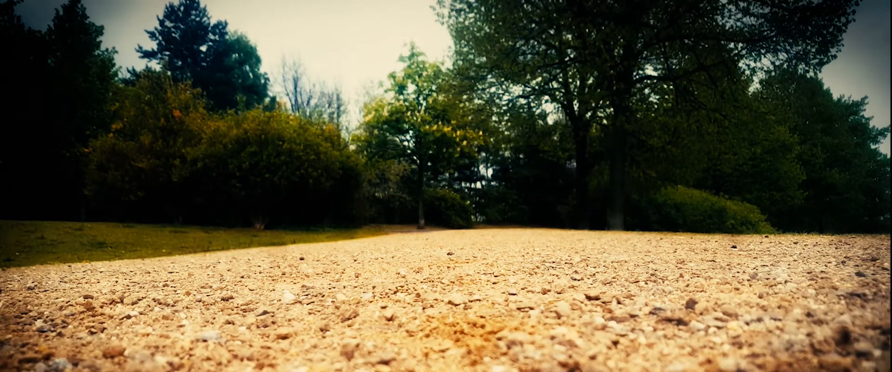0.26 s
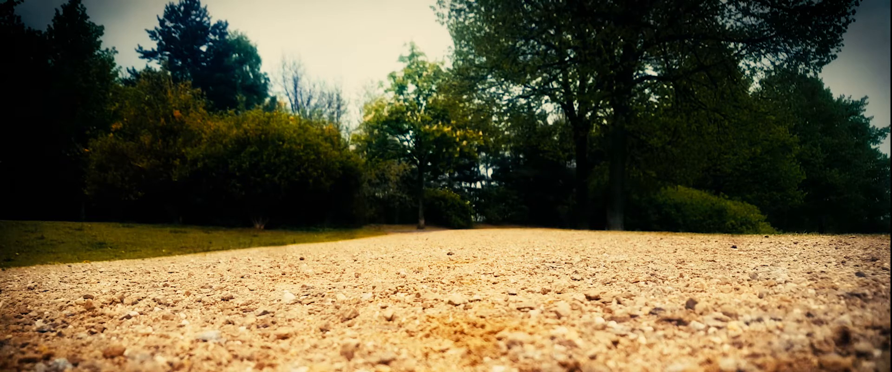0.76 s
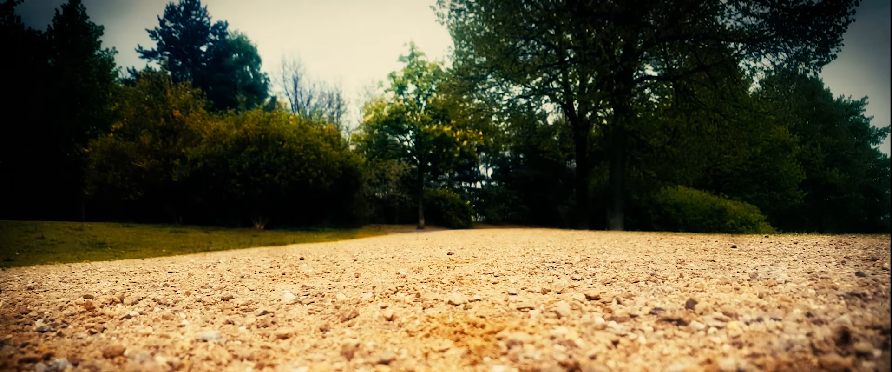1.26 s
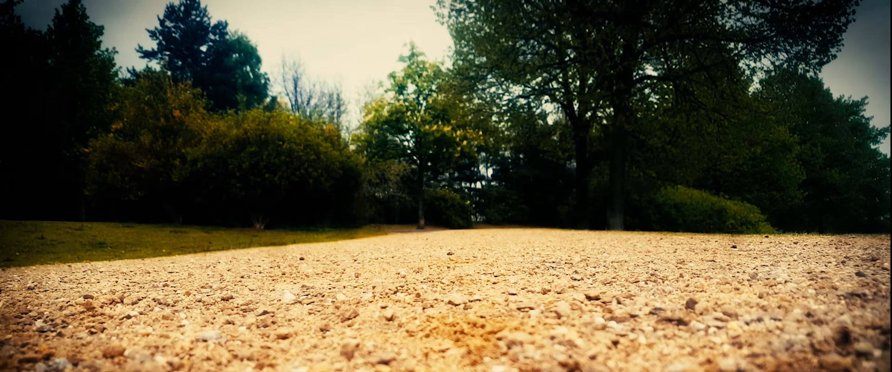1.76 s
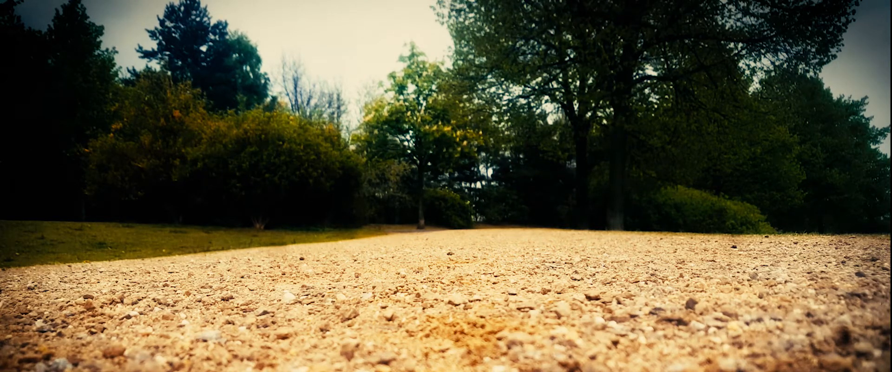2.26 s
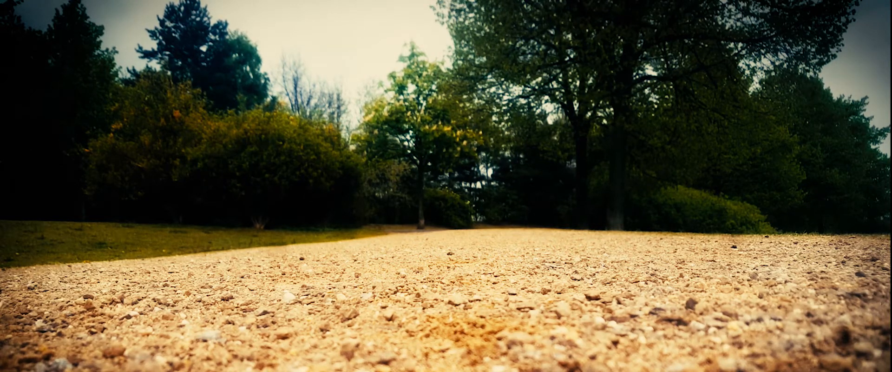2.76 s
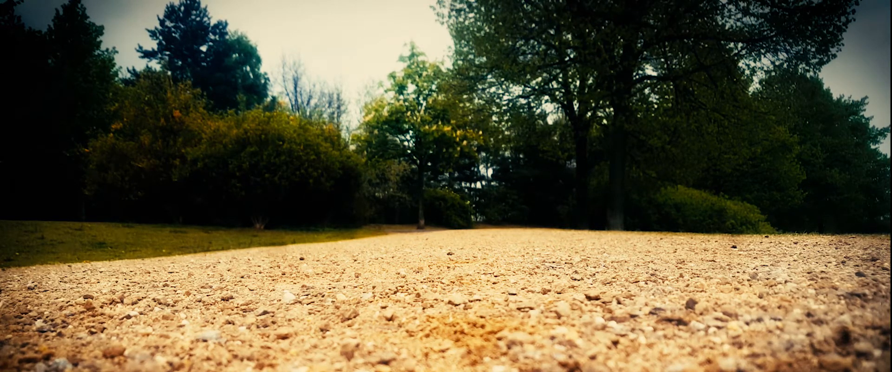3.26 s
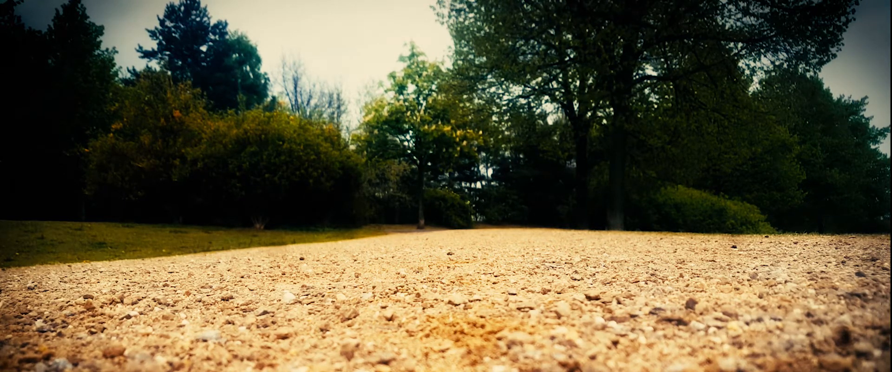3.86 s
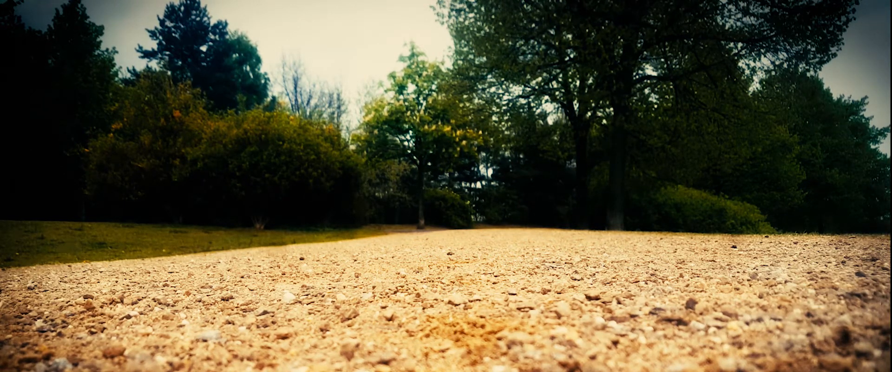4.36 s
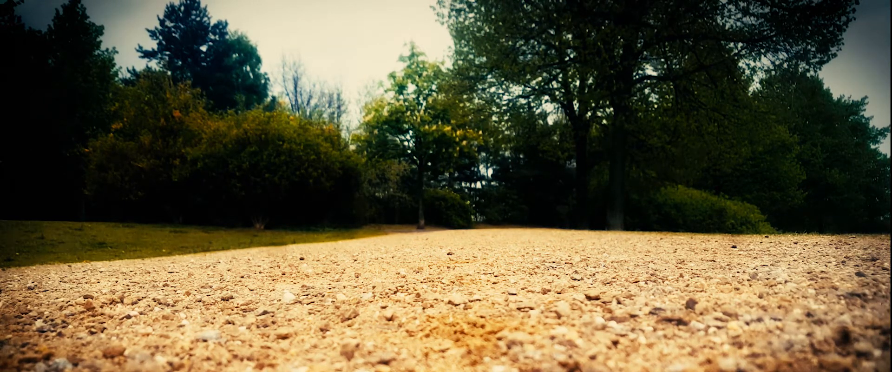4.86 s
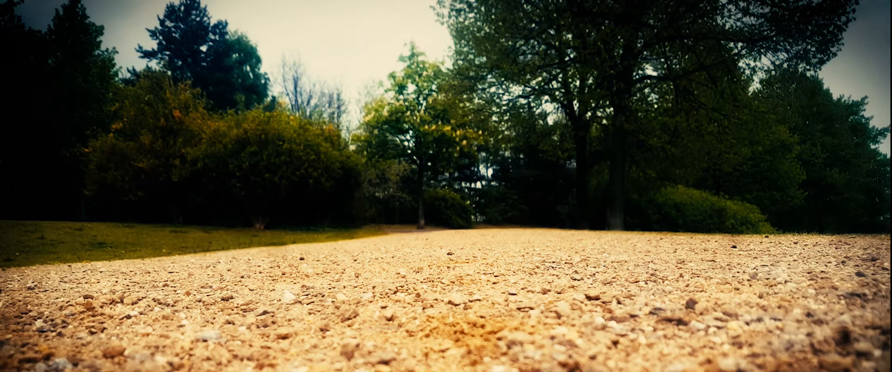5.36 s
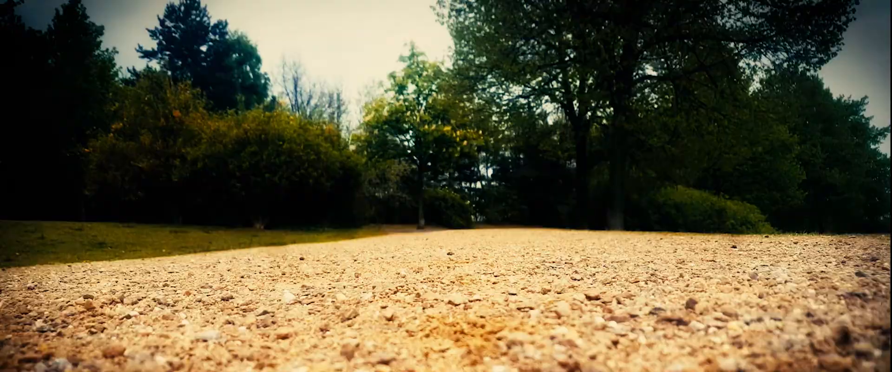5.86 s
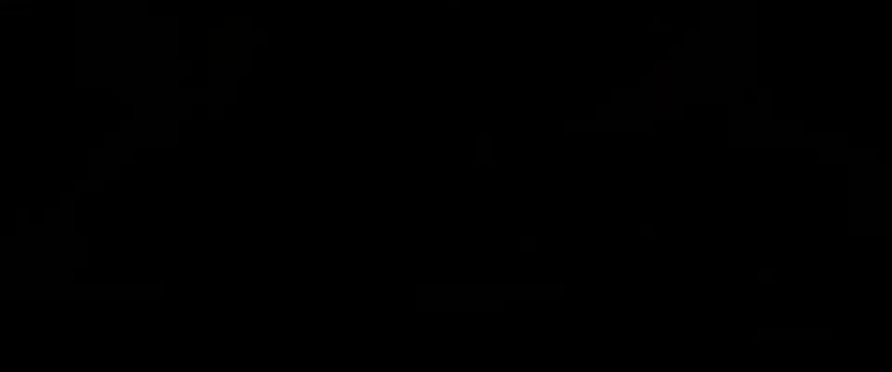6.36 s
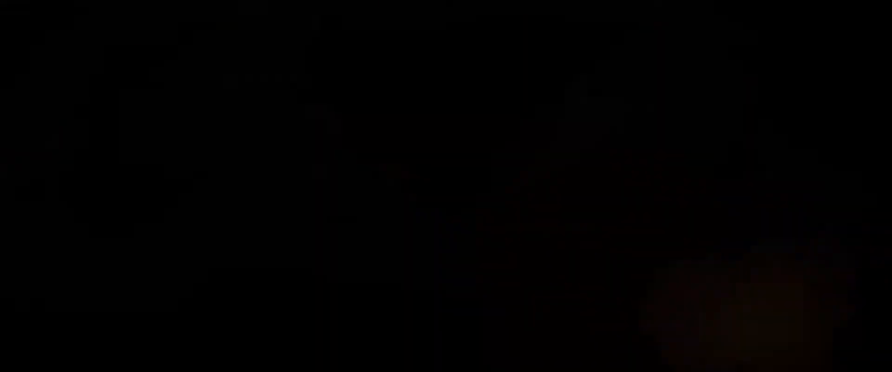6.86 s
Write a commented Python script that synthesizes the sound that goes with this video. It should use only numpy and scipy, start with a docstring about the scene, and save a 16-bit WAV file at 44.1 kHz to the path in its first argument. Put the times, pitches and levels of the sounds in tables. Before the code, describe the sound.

A distant remote-controlled car revs in short, growing bursts, its high electric whine mixed with rough gears and tyres spinning on gravel. A few thin bird chirps and a faraway drone sit behind it. One longer burst brings the car racing past, left to right, very close to microphones on the ground. Its wake buffets them loudly, then pebbles clatter, clink and knock in a thinning shower.

```python
"""A radio-controlled electric car blips its throttle far down a gravel path, then races past.
Its motor whines, its gears growl and its spinning tyres spray gravel. As it passes two microphones
on the ground, from left to right, its wake buffets them and thrown stones knock on their case.
A small bird chirps in the trees over a distant rumble and the hum of faraway machinery."""
import sys
import numpy as np
from scipy import signal
from scipy.fft import rfft, irfft, next_fast_len
from scipy.io import wavfile
from scipy.ndimage import uniform_filter1d, map_coordinates

SR = 44100
rng = np.random.default_rng(int(sys.argv[2]) if len(sys.argv) > 2 else 0)


def store_wav(level_fs):
    """Save 16-bit WAV to argv[1]."""
    pcm = np.round(np.clip(np.atleast_2d(level_fs), -1, 1) * 32767)
    wavfile.write(sys.argv[1], SR, pcm.T.astype(np.int16))


N = 313928
T = np.arange(N) / SR


def from_db(db):
    """Turn decibels into a gain to multiply by."""
    return 10 ** (np.asarray(db) / 20)


def rms_one(x):
    """Scale a signal to an average power of 1."""
    return x / np.sqrt(np.mean(x ** 2) + 1e-20)


def in_time(rows):
    """Join rows that begin with a time by straight lines: one curve for each other column."""
    times, *columns = np.transpose(rows)
    return [np.interp(T, times, column) for column in columns]


def at_hz(points, hz):
    """Look up a frequency in a table, with octaves evenly spaced."""
    freqs, values = np.transpose(points)
    return np.interp(np.log(hz + 1), np.log(freqs), values)


def drift(rate_hz):
    """A smooth random wobble, about 1 in size."""
    r = np.exp(-20 * np.pi * rate_hz / SR)
    slow = signal.lfilter([1], [1, -2 * r, r * r], rng.standard_normal(N // 10 + 4002))[4000:]
    return np.interp(np.arange(N) / 10, np.arange(len(slow)), rms_one(slow))


def gate(start, end, rise, fall):
    """Fade in from start and die away after end; all in seconds."""
    return np.clip((T - start) / rise, 0, 1) * np.exp(-np.clip((T - end) / fall, 0, 20))


def turn(hz):
    """The phase of a tone whose pitch may move."""
    return 2 * np.pi * np.cumsum(hz * np.ones(N)) / SR


def narrow_noise(hz, width_hz):
    """A rough tone: noise gathered around one pitch."""
    return drift(width_hz) * np.cos(turn(hz)) + drift(width_hz) * np.sin(turn(hz))


def noise(spectrum, likeness, grains=1):
    """Stereo noise, chopped into grains and then coloured. Likeness 1: both sides same; -1: opposite."""
    size = next_fast_len(N)
    hz = np.arange(size // 2 + 1) * SR / size
    mid, side = rfft(rng.standard_normal((2, N)) * grains, size)
    alike = np.clip(at_hz(likeness, hz), -1, 1)
    edge_fade = np.minimum(hz / spectrum[0][0], 1) ** 2 / np.maximum(hz / spectrum[-1][0], 1) ** 4
    pair = np.sqrt(1 + alike) * mid + np.sqrt(1 - alike) * side * [[1], [-1]]
    return rms_one(irfft(pair * from_db(at_hz(spectrum, hz)) * edge_fade, size)[:, :N])


def pebbles(per_s, spread_db, ring_s, clump_db):
    """The jumpy loudness of pebbles colliding in clumps: many small ones, a few large."""
    hits = rng.random(N) < per_s / SR
    size_db = spread_db * np.minimum(rng.exponential(1, N), 5) + clump_db * drift(39)
    energy = hits * from_db(size_db) ** 2
    return rms_one(np.sqrt(signal.lfilter([1], [1, -np.exp(-1 / (ring_s * SR))], energy + 1e-12)))


# Blips of the throttle. Each row: start and end in seconds, final growl pitch in Hz, relative levels
# in dB (gears, whine, step per overtone, controller tone, crunch, spray, grit), spray rise in seconds.
THROTTLE_BURSTS = [(0, .44, 1397, -57, -71.5, -2, -78, -70, -64.5, -80, 0.17),
                   (.58, .77, 1423, -57.5, -67.5, -4, -67, -71, -68.5, -84, 0.05),
                   (0.799, 1.275, 1330, -51.5, -68, 0, -70, -63.5, -57, -62.5, 0.36),
                   (1.448, 1.63, 1360, -52, -64.5, -8, -71, -69, -65, -73, .03),
                   (1.772, 1.97, 1326, -50.5, -60.5, -4.5, -64.5, -68, -64.5, -75, .03),
                   (2.259, 2.51, 1385, -48.5, -64.5, -8, -57.5, -63.5, -61, -68, 0.065),
                   (2.619, 2.88, 1298, -43.5, -59.5, -4, -73, -59, -56.5, -61.5, 0.028),
                   (3.224, 3.44, 1411, -44.5, -57, 0.5, -62, -55.5, -52.5, -59, 0.022),
                   (3.56, 3.755, 1432, -46, -58, -1, -50, -56.5, -53, -57.5, .015),
                   (3.885, 4.045, 1273, -45, -62, 0, -54.5, -55, -54.5, -67, 0.02),
                   (4.432, 4.59, 1480, -46, -58, -14, -50, -58.5, -59.5, -80, .015),
                   (4.775, 4.945, 1552, -44, -48.5, -15.5, -44.5, -53.5, -61, -74, 0.017),
                   (5.068, 5.715, 1578, -40, -48, -19, -45, -47.5, -63.5, -74, 0.035)]
def bursts():
    """The settings of the latest throttle burst at every moment, by name."""
    names = "start end growl_hz gears_db whine_db step_db tone_db crunch_db spray_db grit_db build_s"
    columns = np.transpose(THROTTLE_BURSTS)
    latest = np.maximum(np.searchsorted(columns[0], T, side="right") - 1, 0)
    return dict(zip(names.split(), columns[:, latest]))


# The wheels spin up, slip and grip. Each row: time in seconds, motor pitch in Hz.
MOTOR_PITCH = [(0, 4550), (.08, 4640), (.1, 5050), (.13, 6100), (.16, 5570), (.22, 6950), (.31, 6780),
               (.36, 5050), (.43, 4540), (.58, 4400), (.615, 4980), (.645, 4580), (.7, 4950), (.755, 4750),
               (.8, 4430), (.87, 4520), (.935, 4950), (.97, 5500), (1.02, 5920), (1.18, 6230),
               (1.255, 6180), (1.3, 4500), (1.448, 4300), (1.51, 4950), (1.565, 4520), (1.65, 4300),
               (1.775, 1590), (1.82, 3230), (1.855, 4800), (1.91, 5500), (1.935, 5200), (1.97, 4200),
               (2.26, 1377), (2.31, 1800), (2.38, 4494), (2.44, 6000), (2.48, 4950), (2.56, 4530),
               (2.62, 1450), (2.66, 2465), (2.72, 4620), (2.755, 5820), (2.785, 6380), (2.845, 5870),
               (2.89, 4560), (3.23, 1355), (3.31, 3310), (3.36, 4680), (3.425, 4830), (3.45, 4050),
               (3.56, 1813), (3.61, 3100), (3.7, 5110), (3.73, 5500), (3.77, 4860), (3.889, 2480),
               (3.93, 3800), (3.98, 6100), (4.015, 6400), (4.06, 5010), (4.43, 1340), (4.46, 1458),
               (4.495, 3024), (4.53, 2450), (4.565, 2194), (4.605, 1402), (4.78, 1678), (4.815, 1546),
               (4.845, 2500), (4.87, 2887), (4.89, 2280), (4.925, 2465), (4.95, 2244), (5.085, 1392),
               (5.13, 3360), (5.16, 3510), (5.2, 2910), (5.245, 3463), (5.39, 3720), (5.435, 3153),
               (5.47, 3516), (5.505, 2980), (5.57, 3690), (5.645, 3037), (5.67, 3400), (5.71, 2830)]
def revs(inertia_s=0.014):
    """The motor's pitch, smoothed because spinning parts cannot change speed at once."""
    return uniform_filter1d(in_time(MOTOR_PITCH)[0], int(inertia_s * SR))


def dash(gain_db, start_s=5.12, length_s=0.39):
    """A sound grows louder as the last burst brings the car up the path."""
    return from_db(gain_db * np.clip((T - start_s) / length_s, 0, 1))


# How well the motor gives off each pitch. Each row: frequency in Hz, gain in dB.
MOTOR_RESPONSE = [(1400, 22), (1800, 10), (2400, 2.5), (3050, 4), (3700, -10), (4650, 2), (5600, 4),
                  (6700, -5), (7350, 1.5), (8100, -34), (9300, 1.5), (10700, -13), (12100, -1.5),
                  (15000, -11)]
# The whine rasps while the wheels spin hard. Each row: time in seconds, share of clean tone.
CLEAN_SHARE = [(0, .68), (1.6, .55), (1.9, .2), (2.3, .12), (4.1, .15), (4.4, .85), (5.1, .75), (5.7, .5)]
def motor(burst, waver_hz=45, switching_hz=1970):
    """The motor whines with the revs; its speed controller sings at a fixed switching rate."""
    start, end = burst["start"], burst["end"]
    pitch = revs() * (1 + 0.01 * drift(120)) + waver_hz * drift(14)
    phase, whine = turn(pitch), 0
    for k in (1, 2, 3):
        # Uneven speed smears the higher overtones more, and bumps break the whine up.
        clean = in_time(CLEAN_SHARE)[0] ** np.sqrt(k)
        rasp = narrow_noise(k * pitch, width_hz=170 * k)
        partial = np.sqrt(2 * clean) * np.sin(k * phase) + np.sqrt(1 - clean) * rasp
        bumps = from_db(3.4 * drift(45) - 1)
        whine += partial * bumps * from_db(at_hz(MOTOR_RESPONSE, k * pitch) + burst["step_db"] * (k - 1))
    out = from_db(burst["whine_db"]) * whine * dash(2) * gate(start, end, rise=0.043, fall=0.0036)
    # The switching tone fades as the throttle opens fully.
    tone = 1.6 * np.sin(turn(switching_hz)) + .85 * narrow_noise(switching_hz, width_hz=16)
    part_throttle = gate(start, start + .65 * (end - start), rise=.03, fall=.03)
    out += from_db(burst["tone_db"]) * tone * part_throttle
    return out + from_db(-15) * trees(np.array([out, out]), t60=.16, cut_hz=9000)


def gears(burst, start_hz=1783, longest_sink_s=0.16):
    """The gears give a rough growl that sinks in pitch as each burst takes hold."""
    sink_s = np.minimum(longest_sink_s, .8 * (burst["end"] - burst["start"]))
    still_to_sink = np.clip(1 - (T - burst["start"]) / sink_s, 0, 1)
    hz = burst["growl_hz"] + still_to_sink * (start_hz - burst["growl_hz"]) + 35 * drift(30)
    return 1.15 * np.sin(turn(hz)) + .7 * narrow_noise(hz, width_hz=60)


# Coarse, medium and fine gravel. Each row: frequency in Hz, relative level in dB.
CRUNCH_COLOUR = [(1700, 0), (2300, 0.5), (3100, -4), (4200, -11.5), (5000, -17), (6500, -25.5)]
SPRAY_COLOUR = [(3500, -2.5), (4650, 6), (5700, -0.5), (6750, 9.5), (8200, -1), (9500, -1.5), (10800, -14),
                (12000, -28)]
GRIT_COLOUR = [(9000, -14), (11000, -7), (12200, 6), (13200, -4), (16000, -7)]
# How alike the car sounds on both sides. Each row: frequency in Hz, likeness.
CAR_STEREO = [(400, 1), (1200, 0.99), (2000, 0.65), (4000, 0.57), (7000, .3), (10000, .15)]
def spinning_tyres(burst, spin, grains):
    """The tyres crunch on the path; the faster they spin, the finer the gravel that flies."""
    start, end = burst["start"], burst["end"]
    crunch = from_db(burst["crunch_db"]) * dash(12.5) * gate(start, end, rise=0.004, fall=0.013)
    spray = from_db(burst["spray_db"] - 3) * spin ** 0.79 * dash(18.5)
    spray *= gate(start, end, rise=burst["build_s"], fall=0.044)
    grit = from_db(burst["grit_db"] - 2) * spin ** 0.82 * dash(12.5)
    grit *= gate(start, end, rise=.5 * (end - start), fall=0.011)
    layers = [(crunch, CRUNCH_COLOUR), (spray, SPRAY_COLOUR), (grit, GRIT_COLOUR)]
    return sum(level * noise(colour, CAR_STEREO, grains) for level, colour in layers)


# The rattling frame and the rolling wheels. Each row: frequency in Hz, relative level in dB.
RATTLE_COLOUR = [(250, -8), (450, -4), (850, 0.5), (1150, 1), (1400, 12.5), (1850, -1.5), (2150, -17),
                 (3000, -70)]
ROLL_COLOUR = [(100, -1.5), (300, -0.5), (650, 5.5), (950, 8.5), (1500, -11), (2500, -20)]
def far_car(burst, wheelspin_hz=5500, unload_db=-2.5):
    """Each burst sets the gears growling, the frame rattling and the tyres spinning down the path."""
    start, end, spin = burst["start"], burst["end"], revs() / wheelspin_hz
    # The gears unload and quieten as the wheels break loose.
    unloading = from_db(unload_db * spin * np.clip((T - start) / (end - start), 0, 1) ** 3)
    drive = from_db(burst["gears_db"]) * dash(6.5) * unloading * gate(start, end, rise=.014, fall=.0067)
    grains = pebbles(per_s=5600, spread_db=0.5, ring_s=0.00094, clump_db=2.0)
    growl = from_db(-0.5) * gears(burst)
    rattle = from_db(3) * noise(RATTLE_COLOUR, CAR_STEREO, grains)
    tyres = spinning_tyres(burst, spin, grains)
    rumble = spin * from_db(-4) * noise(ROLL_COLOUR, CAR_STEREO, grains)
    return drive * (growl + rattle + rumble) + tyres


# The outdoor rumble. Each row: frequency in Hz, relative level in dB.
AIR_COLOUR = [(15, -58), (25, -16.5), (80, -6), (195, -7), (236, -12), (270, -8), (326, -16.5),
              (405, -13.5), (463, -17), (863, -13.5), (1560, -19.5), (1740, -23.5), (2760, -38),
              (6380, -50.5), (16000, -56.5)]
# How alike it sounds on both sides. Each row: frequency in Hz, likeness.
AIR_STEREO = [(60, 1), (150, 0.97), (300, 0.87), (500, 0.5), (850, -0.24), (1130, -0.62), (2000, 0.15)]
# Faraway machinery. Each row: time in seconds, level of the low drone in dB, of the thin hum in dB.
MACHINERY = [(0, -39, -63), (.4, -53, -93), (.9, -53.5, -50), (1.7, -54.5, -76), (2.2, -52, -52.5),
             (2.8, -45.5, -55), (3.3, -47, -59), (4.2, -53, -55.5), (5.3, -54, -53.5), (6, -57, -64),
             (6.6, -63, -75)]
def background():
    """Faraway machinery drones and hums over an outdoor rumble that fades near the end."""
    drone_level, hum_level = from_db(in_time(MACHINERY))
    air = from_db(-44.5) * noise(AIR_COLOUR, AIR_STEREO) * gate(0, 5.88, rise=0.0011, fall=0.26)
    drone = narrow_noise(86, width_hz=12.7) + from_db(-12) * narrow_noise(170, width_hz=13.5)
    hum = 1.2 * np.sin(turn(408 + 2 * drift(8))) + .6 * narrow_noise(408, width_hz=9)
    return air + drone_level * drone + hum_level * hum


def trees(pair, t60, cut_hz):
    """The trees scatter sound into a soft tail that falls by 60 dB in t60 seconds."""
    t = T[:SR]
    tail = rng.standard_normal((2, SR)) * from_db(-60 * t / t60) * np.minimum(t / 0.043, 1)
    tail /= np.sqrt(np.sum(tail ** 2) / 2)
    dull_tail = signal.sosfilt(signal.butter(1, cut_hz, fs=SR, output="sos"), tail)
    return signal.fftconvolve(pair, dull_tail, axes=1)[:, :N]


def echo(pair, delay_s=.11, level_db=-19.5):
    """A dull slap comes back from the edge of the wood."""
    dull = signal.sosfilt(signal.butter(2, 7000, fs=SR, output="sos"), pair)
    return from_db(level_db) * np.pad(dull, ((0, 0), (int(delay_s * SR), 0)))[:, :N]


# Each row: start and length in seconds, first and last pitch in Hz, relative level in dB.
BIRD_CHIRPS = [(.735, 0.085, 8640, 6900, -71), (0.88, 0.11, 8300, 5900, -72),
               (1.295, 0.17, 7700, 5740, -68.5), (4.806, 0.036, 8800, 8060, -62)]
def bird():
    """A small bird sings thin, slightly husky chirps that slide downward."""
    out = np.zeros(N)
    for start, length, first_hz, last_hz, db in BIRD_CHIRPS:
        progress = np.linspace(0, 1, int(length * SR))
        hz = first_hz + (last_hz - first_hz) * progress + 240 * drift(300)[:len(progress)]
        swell = np.sqrt(np.abs(np.sin(np.pi * progress)))
        at = round(start * SR)
        out[at:at + len(hz)] += from_db(db + 1) * swell * np.sin(2 * np.pi * np.cumsum(hz) / SR)
    return np.array([out, out])


# Each row: start and length in seconds, first and last pitch in Hz, squeal and tick levels in dB.
GEAR_LUNGES = [(2.268, 0.024, 1450, 1534, -35.5, -73), (2.75, 0.043, 1380, 1392, -31.5, -64),
               (3.233, 0.027, 1730, 1773, -40, -65), (3.514, 0.0075, 1600, 1710, -39, -57.5),
               (3.963, 0.028, 1400, 1324, -33.5, -74), (4.393, 0.012, 1604, 1910, -39, -76),
               (4.568, .025, 2000, 1400, -43, -83), (4.776, 0.0037, 1900, 1925, -32.5, -71),
               (4.811, .02, 1550, 1960, -40, -72)]
def lunges():
    """The gears take up slack with a short sliding squeal, and gravel ticks under the tyres."""
    tick = noise(SPRAY_COLOUR, CAR_STEREO)
    flutter = from_db(2 * drift(140))
    rasp_hz = 80 * drift(150)
    out = 0
    for start, length, first_hz, last_hz, squeal_db, tick_db in GEAR_LUNGES:
        hz = rasp_hz + np.interp(T, [start, start + length], [first_hz, last_hz])
        squeal = from_db(squeal_db) * flutter * np.sin(turn(hz))
        out += gate(start, start + length, rise=0.0026, fall=0.0047) * (squeal + from_db(tick_db) * tick)
    return out


def passing(loss_db_per_m, pass_s=6.066, speed_m_per_s=10.8, closest_m=1.36):
    """The car is loudest when closest: sound spreads out and is lost along the ground."""
    distance = np.hypot(closest_m, speed_m_per_s * (T - pass_s))
    return closest_m / distance * from_db(-loss_db_per_m * (distance - closest_m))


# Gravel and tyres heard close up. Each row: frequency in Hz, relative level in dB.
CLOSE_CRUNCH_COLOUR = [(700, -9), (1250, 0), (1700, 4.5), (2400, -1.5), (3300, -5.5), (4300, -13),
                       (6500, -27)]
HISS_COLOUR = [(3000, 3), (5000, -5), (9000, -8.5), (11000, -16), (16000, -18)]
def rolling_by():
    """The tyres plough past with a dense, dull crunch that swells only at the last moment."""
    grains = pebbles(per_s=7000, spread_db=1.6, ring_s=.0006, clump_db=1.8)
    roll = from_db(-23.5) * passing(loss_db_per_m=2) * noise(ROLL_COLOUR, CAR_STEREO, grains)
    roll *= gate(5.26, 6.05, rise=0.55, fall=0.06)
    crunch = from_db(-24.5) * passing(loss_db_per_m=0.5) * noise(CLOSE_CRUNCH_COLOUR, CAR_STEREO, grains)
    hiss = from_db(-31.5) * passing(loss_db_per_m=4.5) * noise(HISS_COLOUR, CAR_STEREO, grains)
    return roll + (crunch + hiss) * gate(5.65, 8, rise=0.16, fall=1)


def clinks(per_s, low_hz, high_hz, cycles, spread_db, sizes=24):
    """Pebbles of many sizes each ring briefly at their own pitch."""
    out, count = 0, int(per_s * N / SR / sizes)
    for hz in np.geomspace(low_hz, high_hz, sizes):
        hits = np.zeros((2, N))
        strength = from_db(spread_db * np.minimum(rng.exponential(1, count), 4))
        hits[:, rng.integers(0, N, count)] = strength * rng.standard_normal((2, count))
        decay, angle = from_db(-60 * hz / (cycles * SR)), 2 * np.pi * hz / SR
        out += signal.lfilter([0, np.sin(angle)], [1, -2 * decay * np.cos(angle), decay**2], hits + 1e-18)
    return rms_one(out)


# Heavy pieces and sand landing close by. Each row: frequency in Hz, relative level in dB.
THUD_COLOUR = [(90, -0.5), (160, 9), (300, 5.5), (650, 7.5), (950, 4), (1500, -11), (2500, -27)]
SAND_COLOUR = [(2800, 2), (4600, -1.5), (7000, -4.5), (9300, -8.5), (10700, -12), (12500, -6.5),
               (16000, -14)]
# How alike close sounds are on both sides. Each row: frequency in Hz, likeness.
CLOSE_STEREO = [(130, -0.53), (330, -0.69), (700, 0.13), (2000, -0.34), (8000, 0.15)]
# Each row: start and end in seconds, relative levels in dB of thuds, crunch and sand.
HANDFULS = [(6.049, 6.069, -21, -21.5, -23), (6.071, 6.11, -26.5, -47, -42),
            (6.117, 6.178, -17.5, -27.5, -25), (6.216, 6.3, -26, -24, -23), (6.311, 6.332, -37, -27, -20.5),
            (6.349, 6.362, -42, -29, -28), (6.364, 6.433, -27.5, -26, -28.5),
            (6.449, 6.531, -29, -26.5, -27.5), (6.538, 6.578, -31, -29.5, -25.5),
            (6.597, 6.65, -33, -31.5, -30), (6.662, 6.722, -37, -38, -34.5),
            (6.715, 6.769, -34.5, -30, -36.5), (6.773, 6.861, -32.5, -33.5, -34.5),
            (6.876, 6.923, -32, -39.5, -33.5), (6.907, 6.99, -29.5, -32, -35), (7, 7.038, -37.5, -36, -42),
            (7.072, 7.113, -44, -37, -48.5)]
def showers():
    """Thrown gravel lands in handfuls: heavy pieces thud, pebbles crunch and clink, sand hisses."""
    thuds, crunch, sand = sum(from_db(levels)[:, None] * gate(start, end, rise=0.0058, fall=0.0065)
                              for start, end, *levels in HANDFULS)
    coarse = pebbles(per_s=380, spread_db=2.0, ring_s=.0009, clump_db=1.2)
    fine = pebbles(per_s=3000, spread_db=2.1, ring_s=.0004, clump_db=1.5)
    ringing = clinks(per_s=400, low_hz=1150, high_hz=4600, cycles=42, spread_db=1.2)
    out = from_db(-0.5) * thuds * noise(THUD_COLOUR, CLOSE_STEREO, coarse)
    patter = noise(CLOSE_CRUNCH_COLOUR, CLOSE_STEREO, coarse + 0.38 * fine)
    out += from_db(-2.5) * crunch * (patter + 0.54 * ringing)
    return out + from_db(-0.87) * sand * noise(SAND_COLOUR, CLOSE_STEREO, fine)


# Each row: start and length in seconds, frequency in Hz, level in dB.
PRESSURE_SWINGS = [(6.053, 0.029, 96, -16), (6.051, 0.023, 180, -12.5)]
def wake(hit_s=6.051):
    """The air behind the car slams the microphones, carries a blast of sand and is left churning."""
    colour = [(45, -8), (80, -2), (120, -9), (155, 5), (190, 4), (250, -12), (400, -13), (1000, -20)]
    wind = noise(colour, likeness=[(60, .7), (300, .5)])
    swings = 0
    for start, length, hz, db in PRESSURE_SWINGS:
        swell = np.sin(np.pi * np.clip((T - start) / length, 0, 1))
        swings += from_db(db) * swell * np.sin(2 * np.pi * hz * (T - start))
    thump = from_db(-19.5) * gate(hit_s, 6.073, rise=.003, fall=.006)
    churn = from_db(-41) * passing(loss_db_per_m=7)
    sand = from_db(-23) * noise(SAND_COLOUR, CLOSE_STEREO) * gate(hit_s, 6.072, rise=0.0097, fall=0.001)
    return swings + (thump + churn) * wind + sand


# How the case rings. Each row: pitch in Hz, level in dB relative to the knock, ring time in seconds.
CASE_RINGS = [(1043, -14.5, 0.036), (1600, -40, 0.015)]
# The largest stones. Each row: start in seconds, knock level in dB, knock pitch in Hz, knock swell in
# milliseconds, clink pitch in Hz, clink level in dB, crack level in dB, left minus right in dB.
STONE_HITS = [(6.0516, -10, 1120, 0.4, 1550, -18, -19, 10), (6.066, -13.5, 800, 1.1, 3920, -8.5, -9.5, -12),
              (6.1765, -6, 880, 1.2, 3420, -16, -5.5, -1), (6.1806, -8, 620, 1.03, 1600, -15, -18, 7),
              (6.1865, -12, 910, .6, 1750, -15, -11, 10), (6.198, -14, 770, 1.5, 1530, -17, -12, 7),
              (6.214, -11, 764, 1, 1870, -12.5, -10, 1), (6.2205, -4, 680, 0.86, 1900, -15, -23, 2),
              (6.233, -9, 670, 1.9, 1770, -29, -30, -8), (6.2752, -12, 440, 2.7, 2360, -19, -9, -2),
              (6.294, -15.5, 665, 1.3, 2928, -11, -16, 2), (6.337, -19, 343, 0.99, 1860, -20, -29, -1),
              (6.371, -20, 538, 0.49, 2850, -19, -11, 5), (6.383, -21, 366, 1.5, 2900, -15.5, -9.5, 0),
              (6.404, -24.5, 333, 1.1, 1350, -22, -26, -8), (6.428, -24, 785, 1.2, 1528, -30, -9.5, -10),
              (6.452, -18.5, 570, 1, 1440, -30, -18, 2), (6.477, -24, 430, 1.47, 1593, -17, -21, -4),
              (6.491, -19, 636, 1.4, 1330, -19, -25, 3), (6.507, -20.5, 472, 1.2, 1420, -28, -16, 0),
              (6.5951, -15, 540, 0.99, 3000, -12.5, -9.5, 0), (6.63, -24.5, 222, 2, 1720, -34, -31, 1),
              (6.67, -22, 557.6, 0.99, 2762, -40, -41, 2), (6.722, -20.5, 685, 2.5, 1430, -27, -28, 1),
              (6.788, -25.5, 553, 2, 1640, -30, -38, 2)]
def stones(clink_ring_s=.02):
    """Each stone gives a hollow knock that rings the case, clinks, and cracks against the gravel."""
    out, t = np.zeros((2, N)), T[:SR // 20]
    bright = signal.butter(1, [2000, 12000], "band", fs=SR, output="sos")
    for start, knock_db, knock_hz, swell_ms, clink_hz, clink_db, crack_db, pan_db in STONE_HITS:
        swell = 1000 * t / swell_ms
        knock = np.sin(2 * np.pi * knock_hz * t * rng.normal(1, .05, (2, 1)))
        knock *= from_db(knock_db) * swell * np.exp(1 - swell)
        notes = [(clink_hz, clink_db, clink_ring_s)]
        for hz, db, t60 in CASE_RINGS:
            notes.append((hz * rng.normal(1, .07), knock_db + db + rng.normal(0, 2.5), t60))
        rings = sum(from_db(db - 60 * t / t60) * np.sin(2 * np.pi * hz * t * rng.normal(1, .049, (2, 1)))
                    for hz, db, t60 in notes)
        crack = signal.sosfilt(bright, rng.standard_normal((2, len(t))) * from_db(-60 * t / 0.0072))
        pan = from_db([[pan_db / 2], [-pan_db / 2]])
        at = round(start * SR)
        out[:, at:at + len(t)] += (knock + rings + from_db(crack_db) * crack) * pan
    return out


# Each row: time in seconds, how much later the right microphone hears the car in milliseconds.
RIGHT_DELAY = [(0, 0.47), (5.8, 0.43), (6.05, 0.297), (6.5, -0.29)]
def left_to_right(pair):
    """The car's sound reaches the farther microphone a little later."""
    delay = in_time(RIGHT_DELAY)[0] * SR / 1000
    return np.array([pair[0], map_coordinates(pair[1], [np.arange(N) - delay], order=3)])


def scene():
    """The car and the bird sound among the trees; the wake and stones hit right at the microphones."""
    burst = bursts()
    far = far_car(burst) + lunges()
    car = left_to_right(far + echo(far) + motor(burst) + rolling_by() + showers())
    direct = car + bird()
    outdoors = direct + from_db(-14) * trees(direct, t60=0.28, cut_hz=20000) + background()
    # The car comes up nearer the left microphone. Each row: time in seconds, left minus right in dB.
    balance_db = in_time([(0, 1.7), (4, 2.4), (5.7, 3.7), (6.2, 1.3), (6.5, -.6)])[0]
    return (outdoors + wake() + stones()) * from_db(balance_db * [[.5], [-.5]])


def record(dry):
    """Round off the loudest peaks and cut the treble above 15950 Hz."""
    return signal.sosfilt(signal.ellip(12, .1, 80, 15950, fs=SR, output="sos"), np.tanh(dry))


dry = scene()
out = record(dry)
store_wav(out)
```